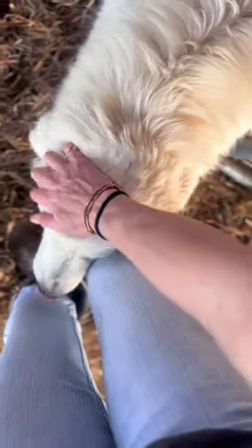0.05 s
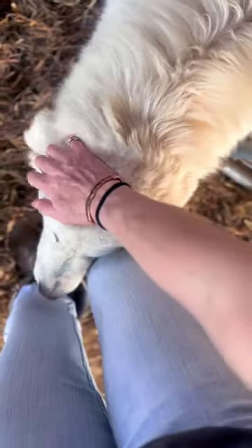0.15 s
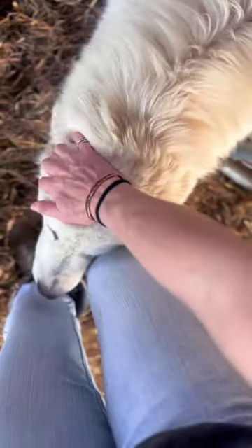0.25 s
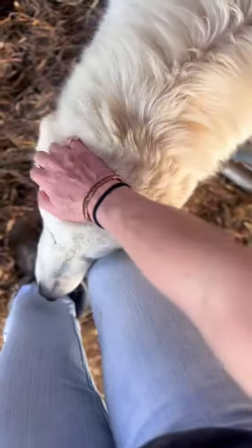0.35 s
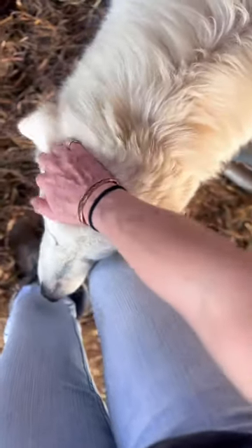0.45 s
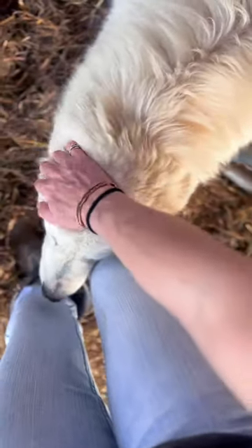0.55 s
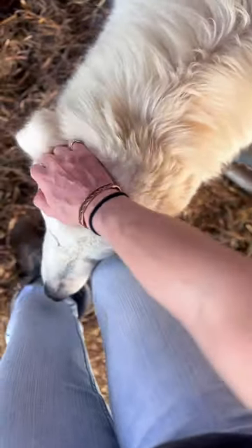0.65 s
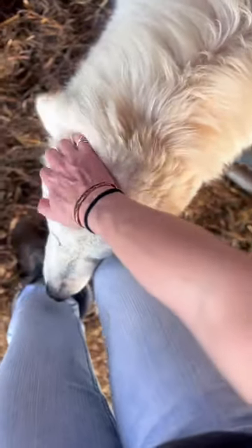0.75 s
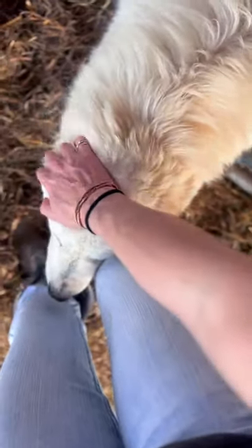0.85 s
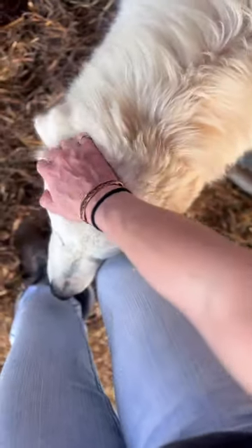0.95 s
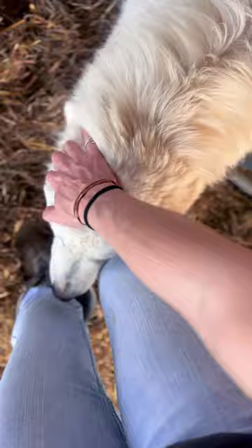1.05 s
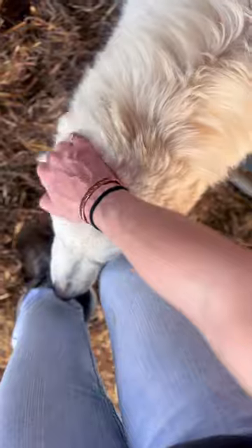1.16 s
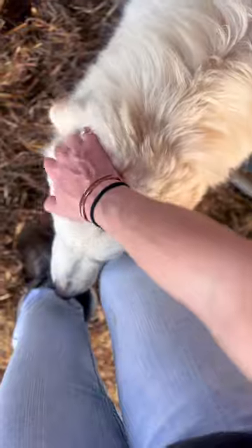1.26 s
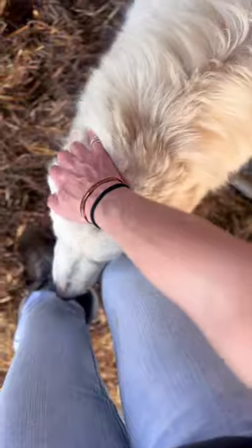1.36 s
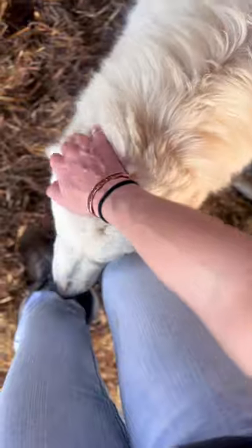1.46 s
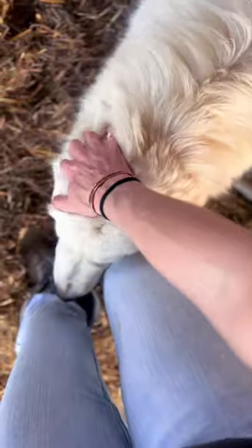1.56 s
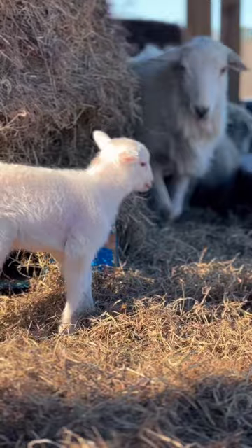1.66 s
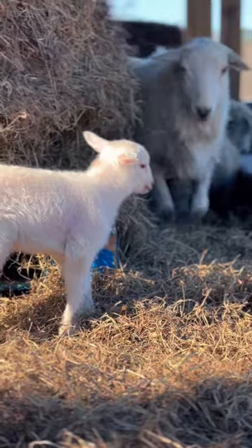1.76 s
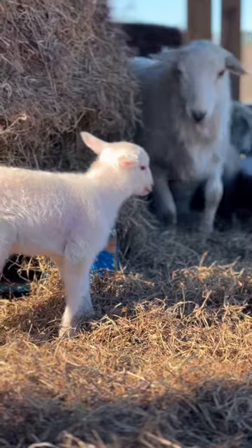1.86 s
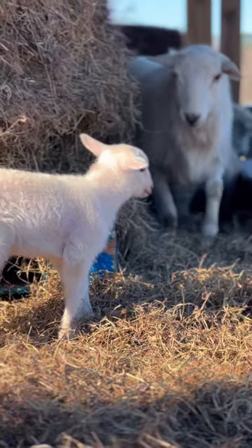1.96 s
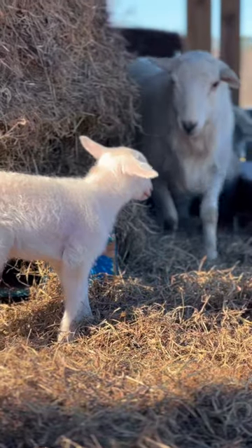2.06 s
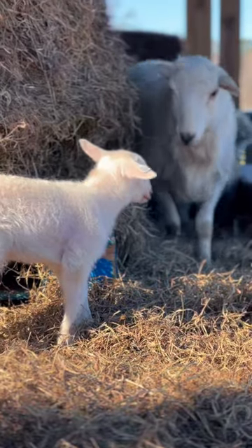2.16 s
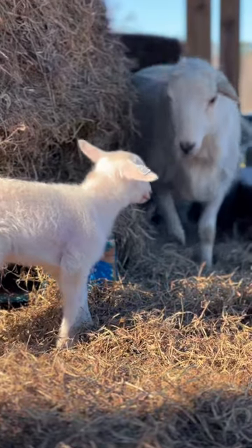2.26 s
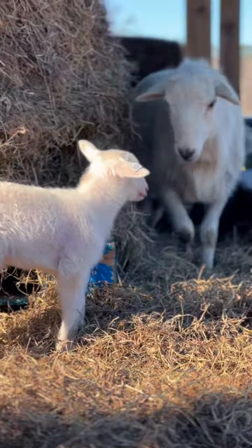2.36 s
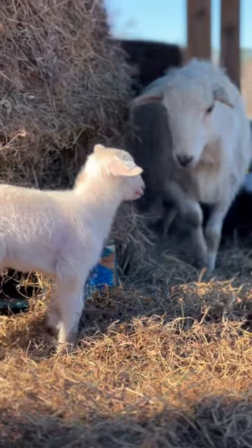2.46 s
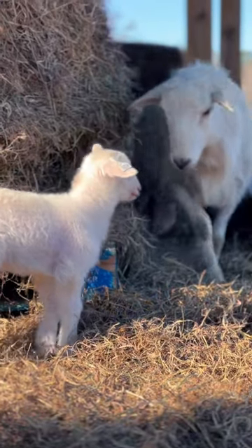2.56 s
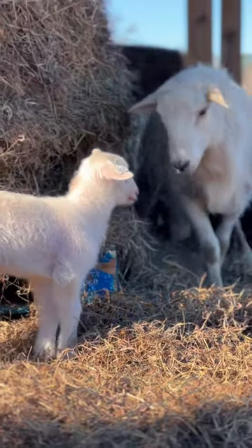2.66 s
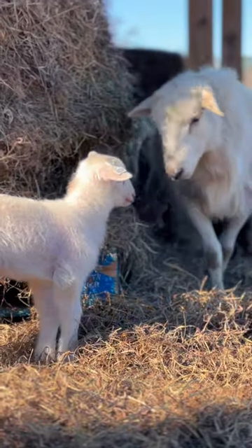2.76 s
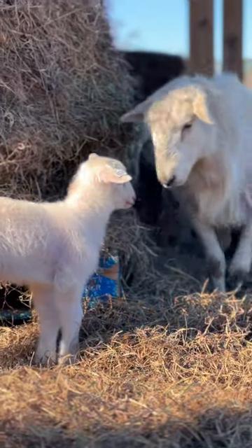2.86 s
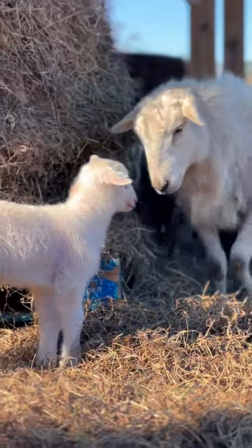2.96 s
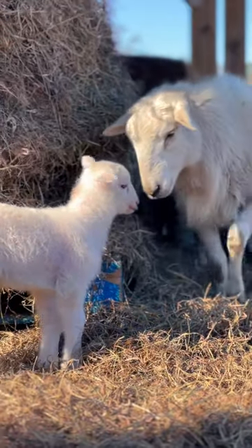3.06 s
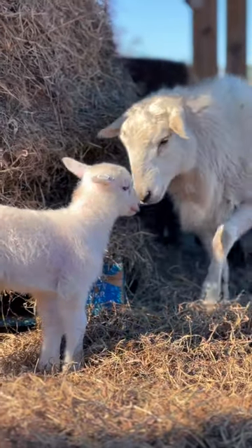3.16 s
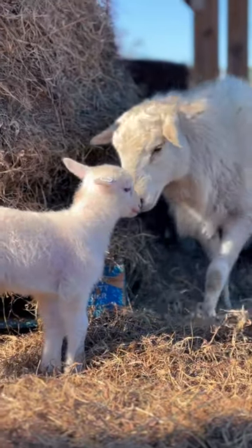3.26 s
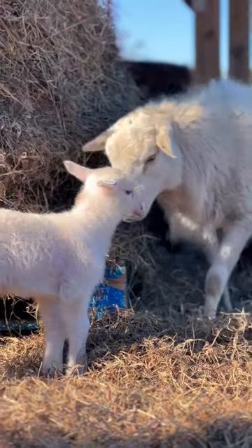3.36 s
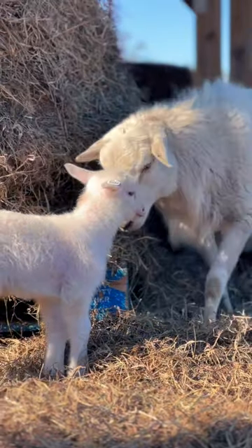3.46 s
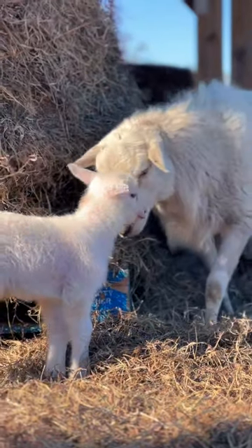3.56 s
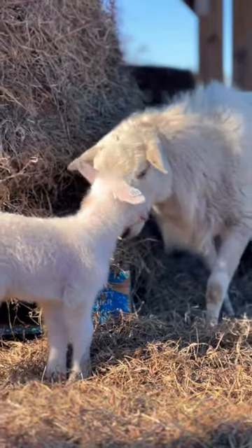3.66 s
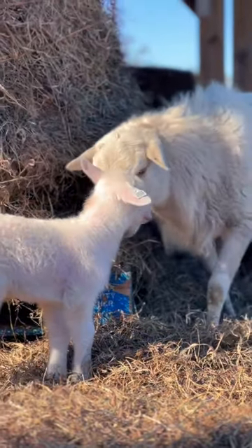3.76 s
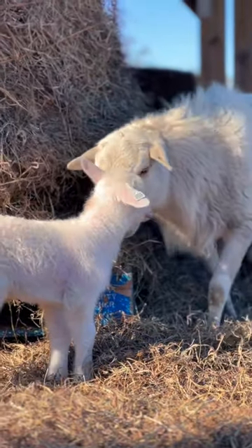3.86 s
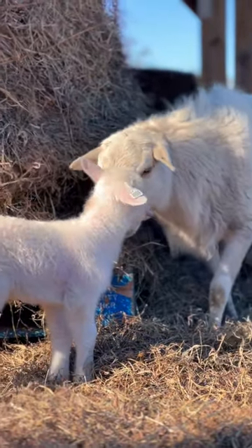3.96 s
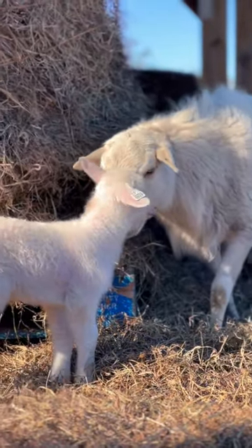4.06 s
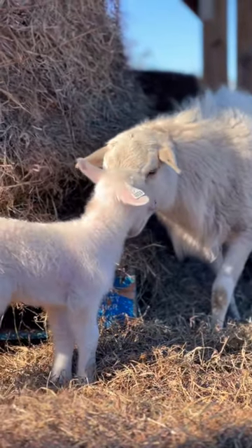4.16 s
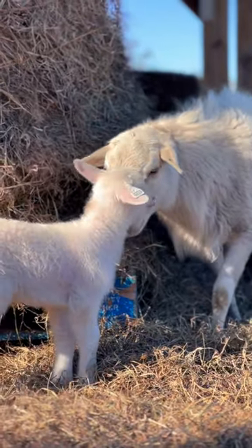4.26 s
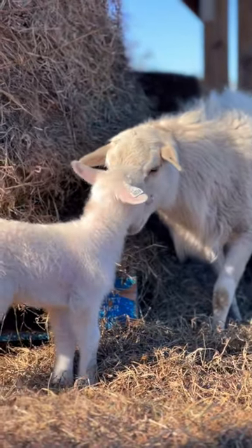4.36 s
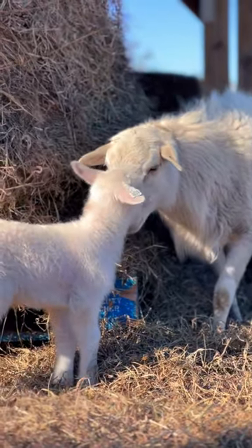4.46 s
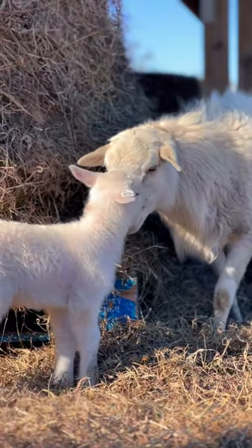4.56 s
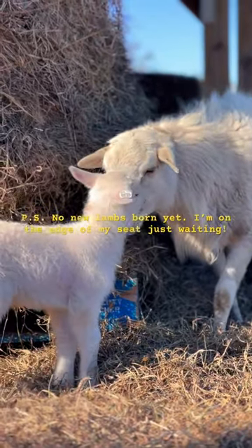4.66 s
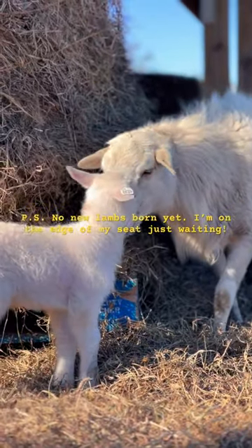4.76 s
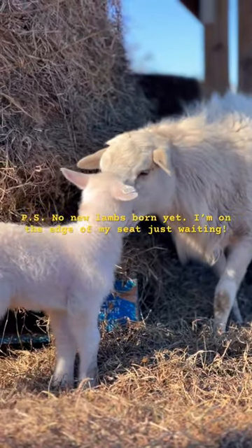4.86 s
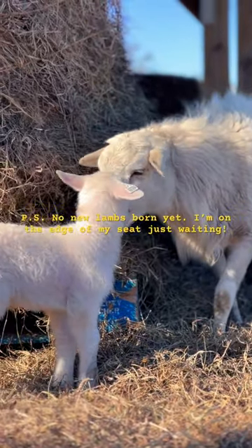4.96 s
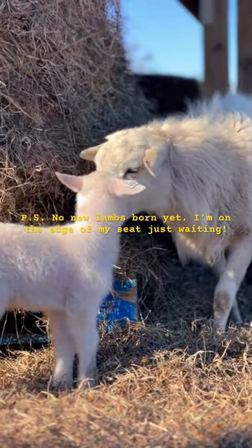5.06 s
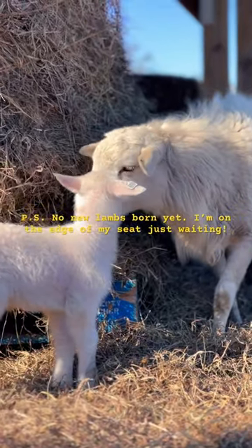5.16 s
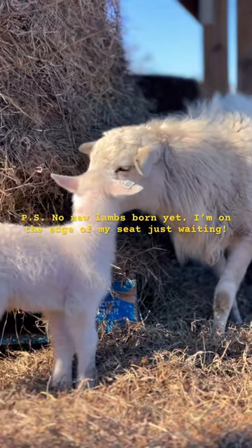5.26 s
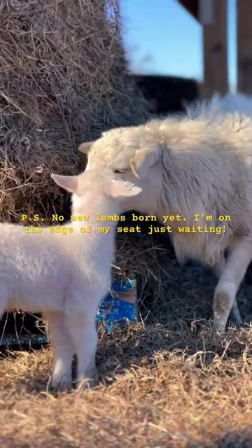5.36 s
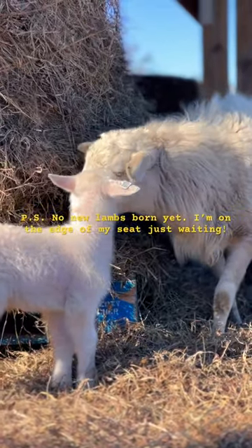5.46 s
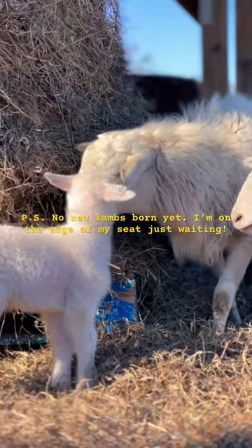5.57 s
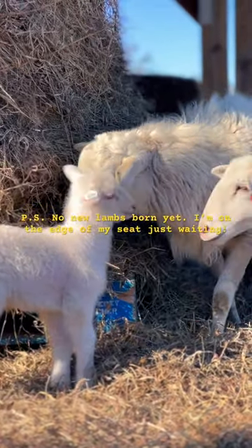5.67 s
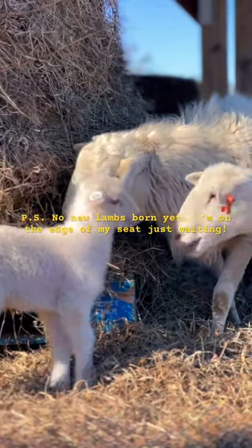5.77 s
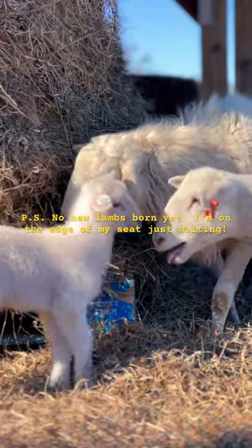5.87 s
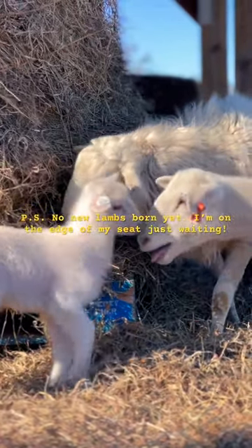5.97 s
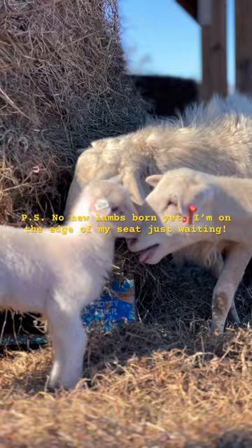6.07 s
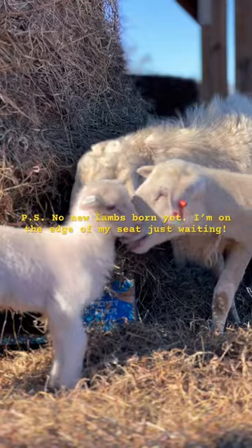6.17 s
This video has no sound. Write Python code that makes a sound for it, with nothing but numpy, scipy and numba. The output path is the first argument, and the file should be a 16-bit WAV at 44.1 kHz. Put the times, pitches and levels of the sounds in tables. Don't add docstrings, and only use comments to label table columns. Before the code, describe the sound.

A faint distant sheep bleat beside soft dog sniffs and a snort, then three close, hoarse, quavering bleats in a windy hay barn.

```python
import sys
import numpy as np
from scipy import signal
from scipy.fft import rfft, irfft, next_fast_len
from scipy.io import wavfile
from scipy.ndimage import uniform_filter1d
from numba import njit

SR = 44100
rng = np.random.default_rng(int(sys.argv[2]) if len(sys.argv) > 2 else 0)


def linear_from_db(decibels):
    return 10 ** (np.asarray(decibels, float) / 20)


def to_wav(sig):
    pcm = np.clip(np.atleast_2d(sig), -1, 1) * 32767
    pcm = np.round(pcm).astype(np.int16)
    wavfile.write(sys.argv[1], SR, pcm.T)


N = 274743
CUT_S = 1.661

# start_s, chest_level_db, pitch_hz, fold_pressing_db (brightness)
FAR_BLEAT = [
    (0.42, -60, 160.2, -5),
    (0.468, -48, 159.7, -11.5),
    (0.574, -47, 175.7, -6),
    (0.612, -43, 177.5, -18.5),
    (0.66, -44.5, 181.2, -8),
    (0.716, -41.5, 185.8, -16.5),
    (.8, -46, 182.9, -8.5),
    (0.88, -45, 178.2, -12.5),
    (0.93, -51, 180.4, -19),
]
FIRST_BLEAT = [
    (2.114, -40, 161, 3),
    (2.16, -33.5, 165.5, -2.5),
    (2.25, -33.5, 171.3, -6.5),
    (2.305, -33.5, 173.3, -2),
    (2.335, -37, 190.4, -1.5),
    (2.41, -30.5, 176.3, -2),
    (2.451, -33, 188.6, -0.5),
    (2.52, -35.5, 175.2, -1.5),
    (2.619, -59, 150, 8.5),
]
SECOND_BLEAT = [
    (3.462, -40.5, 157, 0.5),
    (3.566, -31, 166, 5.5),
    (3.64, -32.5, 175.8, 0),
    (3.684, -31.5, 164.3, -1.5),
    (3.73, -34, 182, -1),
    (3.8, -35.5, 183, -3),
    (3.852, -34.5, 165.4, 2.5),
    (3.962, -38.5, 163, -1.5),
    (4.012, -64, 162, 2.5),
]
LAST_BLEAT = [
    (5.712, -39, 166.4, 12),
    (5.736, -49.5, 161, 13.5),
    (5.769, -34, 156, -4),
    (5.834, -28.5, 169, -3.5),
    (5.894, -31, 163.1, 3),
    (5.933, -28.5, 175, -2.5),
    (5.991, -28.5, 170, 3),
    (6.082, -29, 167.6, 0.5),
    (6.179, -51.5, 176, -16.5),
]
# throat_hz, throat_width_hz, sinus_db, nose_top_hz, shut_mouth_drop (0-1), opening_s
VOICES = [
    (673, 143, -3.5, 22000, 0.05, 0.56),
    (680, 194, 1.5, 5700, 0.07, 0.028),
    (675, 192, -1, 3870, 0.4, 0.035),
    (671, 184, 2, 3110, 0.14, 0.083),
]
# mouth_hz, nose_hz, mouth_db, rasp_start_db, rasp_rise_db_per_s
MOUTHS = [
    (1790, 2770, -4.5, -5, 28.5),
    (1905, 2830, 0, -9, -6),
    (1874, 2726, -8.5, -31.5, 36),
    (1820, 2708, -5, -33.5, 26),
]
# mouth_sag_hz_per_s, mouth_width_hz, low_chest_db, nose_width_hz, nose_climb_hz_per_s
TRACTS = [
    (-60, 150, -9.5, 70, -300),
    (54.5, 118, -7.5, 380, -100),
    (198, 53, -8, 290, 0),
    (332, 140, -13, 147, 150),
]
# period_jitter (0-1), pulse_spread_db, breath_share (0-1)
HOARSE = [
    (.022, 2.2, .65),
    (.01, 1.4, .28),
    (.008, 1.3, .26),
    (.01, 1.3, .3),
]
# centre_hz, width_hz, level_db
RASP_MODES = [
    [(4570, 780, 5), (5800, 320, 1), (6800, 600, 0), (8600, 700, -10)],
    [(4500, 420, 7), (5870, 520, 1.5), (7260, 690, 2), (8940, 420, -5)],
    [(3840, 250, 8), (5440, 450, 1.5), (6080, 500, -4), (8550, 760, 0)],
    [(4200, 240, 7), (5780, 520, 0), (7100, 220, 1), (8470, 370, -4.5)],
]
# level_db (beside the chest), rise_db_per_s
BUZZ = [
    (-28.5, 12),
    (-10, -15),
    (-11, 19),
    (-26, -9),
]
BUZZ_TOP_HZ = [1320, 2000, 1940, 1170]
MOUTH_FADE_DB_PER_S = [-5, -8, 27, 7]
SINUS_HZ = [3440, 3428, 3387, 3504]
SINUS_RISE_DB_PER_S = [-9, 8.5, 21.5, 20]
THROAT_CLIMB_HZ_PER_S = [48.7, 53.6, 140, 22]
CHEST_FLOOR_HZ = [151, 410, 505, 450]
ECHO_DB = [-9, -11, -11, -13]
# start_s, peak_db
SLAPS = [(2.1253, -28), (2.1299, -22), (2.1534, -7.5), (2.1784, -11.5), (2.2126, -9), (2.2291, -12.5),
         (2.287, -6.5), (2.3111, -8), (2.343, -20), (2.3544, -14), (2.3701, -17), (2.3874, -7),
         (2.3933, -4.5), (2.4052, -10), (2.4274, -16), (2.4603, -10), (2.4654, -7.5), (2.495, -16),
         (2.524, -15), (2.5399, -8.5), (2.5777, -22), (3.4685, -29), (3.4864, -21), (3.5057, -9.5),
         (3.5385, -7), (3.5616, -11.5), (3.5846, -3.5), (3.621, -11), (3.6912, -12), (3.7118, -14),
         (3.7329, -8.5), (3.75, -8), (3.7714, -6.5), (3.7835, -9.5), (3.7939, -13.5), (3.8171, -6.5),
         (3.8359, -7.5), (3.8659, -13), (3.8967, -15.5), (3.9211, -24.5), (3.9383, -16.5), (5.7142, -21),
         (5.7325, -16), (5.759, -19), (5.7718, -16), (5.7899, -9), (5.8255, -15), (5.8547, -8),
         (5.8786, -5), (5.9026, -11), (5.9485, -1.5), (5.9722, -5.5), (5.9836, -5), (6.0242, -3),
         (6.0474, -4), (6.0722, -12), (6.1011, -4)]
# start_s, end_s, times_hoarser
BREAKS = [
    (2.32, 2.38, 1.6),
    (2.52, 2.62, 1.8),
    (3.695, 3.82, 3.5),
    (3.9, 4.02, 2.2),
    (6.08, 6.105, 1.6),
    (6.105, 6.17, 4),
]
# centre_s, chest_db, mouth_and_nose_db
CATCHES = [(0.494, -3.5, 1.5), (.562, -12.5, -4), (0.652, -10, -4), (0.697, -7.5, -1), (0.736, -8, 3),
           (.772, -4, 3), (0.811, -7, -1), (0.863, -1.5, -1), (0.903, -13.5, -2), (2.173, -10, 2.5),
           (2.247, -14.5, 6), (2.299, -3, 1.5), (2.339, 4.5, -2), (2.407, -43.5, -4.5), (2.485, -12, -5),
           (3.526, -40.5, -11.5), (3.602, -5.5, 0.5), (3.728, 8, -5.5), (3.837, -9.5, -0.5),
           (3.916, 3.5, -12), (5.864, 1, 5.5), (5.97, -9, 1), (6.04, -18, -6), (6.115, -3.5, -2)]
# centre_s, level_db, spread_s
FLARES = [(2.155, 3, .005), (2.289, 7.5, .005), (2.313, 8, .005), (2.371, -4, .004), (2.396, 9.5, .007),
          (2.467, 6, 0.0074), (2.496, 7, .005), (2.546, 10, .006), (2.585, 4, .008), (3.586, 5, .006),
          (3.718, 13, .006), (3.82, 12, .005), (3.838, 4.5, .006), (3.872, 9.5, .012), (3.942, 12, .012),
          (5.79, 16, .005), (5.882, 8, .012), (5.954, 13.5, .008), (5.974, 4, .005), (6.028, 8, .007),
          (6.051, 9.5, .006), (6.103, 17.5, .006), (6.124, 32, .007)]
# centre_s, level_db, spread_s
SINGS = [(.52, -52, 0.031), (.6, -51, 0.018), (0.67, -43, 0.0075), (.718, -57, 0.0093),
         (0.754, -37.5, 0.0041), (.79, -59, 0.0062), (0.841, -73, 0.015), (.885, -56, 0.0082),
         (2.21, -64, 0.017), (2.454, -29, 0.0065), (3.569, -37.5, 0.0068), (3.636, -31.5, 0.013),
         (3.78, -39.5, 0.021), (3.9, -40, 0.0095), (5.806, -29.5, 0.018), (5.84, -21, 0.008),
         (5.937, -24, 0.014), (6.022, -39, 0.014), (6.085, -41, 0.0076)]
MOUTH_FOLLOWS, RASP_FOLLOWS = 0.43, 2.08
CATCH_S, CATCH_SAG_HZ_PER_DB = 0.0062, .4
WANDER_S, NOSE_WANDER, WAVER = .02, .018, .3
LIMP_DB = 2.5
REOPEN_SHARE, REOPEN_AT = .3, .52
SING_OVERTONE, SING_WIDTH_HZ = 4, 45
FLICKER_DB, FLICKER_PER_S = 2.2, 28
MOUTH_FLICKER_DB, RASP_FLICKER_DB = 1.3, 2.0
LATE_NOSE_S, LATE_RASP_S = 0.025, 0.027
ATTACK_S, RELEASE_S = 0.009, 0.023

# start_s, end_s, pulses_per_s, first_db, last_db
CREAK_SPELLS = [
    (3.35, 3.391, 137, -57, -50),
    (3.3974, 3.425, 87, -48, -50),
    (5.574, 5.62, 130, -61.5, -51),
    (5.686, 5.713, 150, -43.5, -46),
]
# start_s, end_s, pulses_per_s, first_db, last_db
WAKING_SPELLS = [
    (2.088, 2.14, 165, -43.5, -21),
    (3.432, 3.479, 170, -53, -27),
]
# start_s, peak_db
TICKS = [(2.004, -58), (2.019, -68), (2.027, -60), (2.053, -59), (2.064, -59), (2.07, -57), (5.6285, -54),
         (5.641, -54), (5.65, -53), (5.6591, -46), (5.669, -54), (5.677, -50), (5.7151, -33.5)]
# centre_hz, width_hz, level_db
CREAK_MODES = [(1350, 330, 3.5), (1670, 510, 0.5), (2600, 170, 7)]
# centre_hz, width_hz, level_db
GRUNT_MODES = [(676, 180, 0.5), (1095, 130, 4), (1900, 200, -3), (2306, 100, 0.5), (2720, 540, -7)]
# centre_s, spread_s, pitch_hz, level_db
MURMUR = (5.705, .02, 178, -34)
CREAK_GAP_SPREAD, CREAK_SPREAD_DB = .05, 1.5
NARROW_UNTIL_S, NARROW_CUT_HZ = 4, 1000
WAKING_HZ, WAKING_WIDTH_HZ = 1910, 210

# time_s, level_db
SNORT = [
    (1.47, -68),
    (1.53, -48.5),
    (1.574, -49.5),
    (1.628, -48.5),
    (1.66, -55.5),
]
# centre_s, level_db, spread_s
SNIFFS = [
    (.06, -65, 0.013),
    (.13, -62.5, 0.056),
    (.265, -58, 0.017),
    (.33, -62, 0.028),
    (.4, -64, 0.034),
]
# centre_hz, width_hz, level_db
SNOUT_MODES = [(487, 220, 2), (1385, 230, 5), (1900, 270, 2), (2970, 630, -4), (4250, 810, -4),
               (5350, 1000, -6.5), (7600, 1500, -9)]

# time_s, rumble_db, flutter_db (relative)
WIND_FAR = [
    (0.0, -99, -31),
    (0.032, -60, 13),
    (0.832, -59, 12),
    (0.99, -63.5, -4),
    (1.5, -55, -5),
    (1.655, -69, 22.5),
]
# time_s, rumble_db, flutter_db (relative)
WIND_NEAR = [(1.66, -47.5, 12), (1.88, -35, -6), (1.95, -46.5, 1), (2.07, -36, 1.5), (2.44, -43.5, 2),
             (3.35, -47.5, 2), (3.7, -50.5, 9), (4.84, -47.5, -5), (5.1, -47.5, -9.5), (5.48, -53.5, -9),
             (5.73, -52.5, 9), (6.23, -55.5, 6)]
# centre_s, rumble_db, flutter_db
BUFFETS = [(0.056, 10.5, -1.5), (.17, 7.5, -71), (.27, 16.5, -7), (.54, -6, -7), (.602, 4, -1),
           (.74, 2, -11), (.814, -1, 2.5), (1.008, 2, 5), (1.681, 12.5, -5), (1.73, -0.5, -2.5),
           (1.84, 3, -4), (1.958, 13, 13), (2.22, 6, 5.5), (2.351, 0, 1), (2.399, 13, 7.5),
           (2.626, 9.5, 12.5), (2.663, -1.5, -8.5), (3.019, 5.5, 6.5), (3.06, 0, -5.5), (3.15, 1, -1),
           (3.29, 8.5, -4), (3.315, -9, -9.5), (3.346, 4, 4), (3.61, 8, -7), (3.79, 14, -5),
           (3.88, -6, -13), (3.951, 3.5, 3), (4.052, 10.5, 5.5), (4.319, 11, 7.5), (4.69, 3.5, 4.5),
           (5.139, 4, -4), (5.308, 2.5, 1.5), (5.64, 5, 0.5), (5.9, -16, -1), (6.11, 8.5, 1.5)]
BUFFET_S = 0.026
# centre_s, peak_db, pitch_hz
POPS = [(.055, -39, 356), (.32, -52, 645), (.39, -53, 744), (.43, -63, 800), (1.161, -48, 385),
        (1.77, -46.5, 344), (1.817, -60, 353), (1.896, -61, 490), (1.94, -39, 470), (2.021, -37, 423),
        (2.805, -53, 407), (2.874, -62, 369), (2.969, -47, 398), (3.004, -37, 380), (3.085, -52, 361),
        (3.176, -44.5, 390), (3.316, -52, 600), (3.347, -48, 580), (4.161, -46, 398), (4.319, -48, 456),
        (4.561, -58, 290), (4.65, -62, 610), (4.865, -59, 425), (4.905, -47, 390), (4.995, -63, 630),
        (5.171, -58, 510), (5.23, -61, 640), (5.26, -53, 487), (5.385, -59, 920), (5.42, -57, 1200)]
POP_CYCLES = 1.15

# centre_s, level_db, spread_s
STIRS = [(.08, -68.5, 0.072), (.29, -68, 0.017), (.58, -68, 0.22), (.81, -69, 0.029), (1.063, -64.5, 0.029),
         (1.452, -68, 0.18), (1.942, -63, 0.076), (2.5, -63.5, 0.29), (3.1, -58.5, 0.099),
         (3.42, -65.5, 0.061), (3.749, -62, 0.16), (4.09, -67, 0.016), (4.3, -73.5, 0.17),
         (4.72, -79, 0.052), (4.991, -70, 0.053), (5.294, -67, 0.051), (5.467, -67.5, 0.046),
         (5.6, -68.5, 0.028), (5.86, -57, 0.07), (6.08, -63.5, 0.068)]
# freq_hz, density_db
RUSTLE_MID = [(700, -24.5), (1200, -9.5), (4000, -7), (5100, -9), (6200, -2.5), (8000, 2), (11000, 2.5),
              (12200, -0.5), (12700, -55)]
# freq_hz, density_db
RUSTLE_SIDE = [(4200, -40), (5000, -3.5), (5700, -21.5), (6000, -50), (7600, -50.5), (8000, -7),
               (12000, -2), (15800, -3)]
BED_DB = -74.5

# centre_hz, width_hz, rms_db, start_s
HUM = [
    (517, 9.9, -81, 4.9),
    (1001, 45, -82, 2.46),
]
HUM_FADES_S, HUM_FADE_DB_PER_S = 5.3, 1
DRONE_HZ, DRONE_DB, DRONE_FROM_S, DRONE_TO_S = 291.5, -62, 4.55, 5.65

# freq_hz, density_db
AIR_FAR = [(260, 0.5), (450, -2), (610, -12), (645, -30), (708, -17), (942, -14.5), (1120, -20),
           (1950, -11), (4090, -27), (5320, -17.5), (9000, -120)]
# freq_hz, density_db
AIR_NEAR = [(260, -9), (450, -9), (522, -4.5), (546, -14), (622, -12.5), (701, -18), (1020, -14.5),
            (1580, -14), (4090, -27), (5320, -69.5), (9000, -120)]
AIR_FAR_DB, AIR_NEAR_DB = -59.5, -72
# freq_hz, level_db
WIDE_FAR = [(60, -32), (150, -14.5), (370, -9.5), (930, 1.5), (1500, -7), (3600, 1.5), (5600, -7),
            (6100, -47)]
# freq_hz, level_db
WIDE_NEAR = [(150, -53), (370, -40.5), (650, -10.5), (950, -19), (1500, -29), (2500, -48)]
# freq_hz, level_db
WIDE_TOP = [(4100, -47.5), (4500, -9.5), (5100, 7), (5700, -20), (6000, -49), (7500, -52), (8000, -7)]


def bleat(rows, mouth_row, voice, hoarse, fading, sinus_hz, climb, rasp_modes, buzz_row, sinus_rise, floor_hz,
          tract, buzz_top_hz):
    throat_hz, throat_width, sinus_db, top_hz, drop, opening_s = voice
    mouth_hz, nose_hz, mouth_db, rasp_db, rasp_rise = mouth_row
    sag, mouth_width, low_chest_db, nose_width, nose_climb = tract
    begin_s = rows[0][0]
    start, count = round(begin_s * SR), round((rows[-1][0] - begin_s) * SR)
    span = slice(start, start + count)
    chest_db, pitch, pressing = in_time(rows, count=count)
    age = np.arange(count) / SR
    centred = age - age.mean()

    opening = 1 - drop * np.clip(1.3 - 2.0 * age / opening_s, 0, 1)
    mouth_hz = mouth_hz - sag * centred
    nose_hz = nose_hz + nose_climb * centred
    throat_hz = throat_hz + climb * centred

    nose_db = chest_db + pressing
    mouth_db = chest_db + MOUTH_FOLLOWS * pressing + mouth_db - fading * centred
    rasp_db = chest_db + RASP_FOLLOWS * pressing + rasp_db + rasp_rise * age
    dips = np.array([np.exp(-.5 * ((age + begin_s - s) / CATCH_S) ** 2) for s, low, high in CATCHES])
    low_db, high_db = np.transpose(CATCHES)[1:] @ dips
    chest_db, mouth_db, nose_db = chest_db + low_db, mouth_db + high_db, nose_db + high_db
    rasp_db = rasp_db + high_db + sum(db * bump(s, spread)[span] for s, db, spread in FLARES)
    buzz_db = chest_db + buzz_row[0] + buzz_row[1] * centred

    noise = rng.standard_normal(SR)[:count]
    window = int(WANDER_S * SR)
    wander = NOSE_WANDER * rms_one(uniform_filter1d(uniform_filter1d(noise, window), window))
    pitch = pitch + CATCH_SAG_HZ_PER_DB * low_db
    cycles = np.cumsum(pitch * (1 + WAVER * np.roll(wander, count // 2))) / SR
    slap_samples = [round(s * SR) - start for s, db in SLAPS]
    cycles = in_step(cycles, [i for i in slap_samples if 0 < i < count])
    flow, rough, snap = fold_pulses(cycles, pitch, nose_db, begin_s, hoarse, noise)

    chest = resonance(resonance(flow, throat_hz, throat_width * 1.03), throat_hz * opening, throat_width)
    chest += linear_from_db(low_chest_db) * resonance(flow, 524.0, 163.0)
    chest -= linear_from_db(-33.0) * resonance(flow, 1252.0, 550.0)
    chest = passed(chest, 3, floor_hz, "high")
    mouth = resonance(resonance(snap + 1.0 * flow, mouth_hz * opening, mouth_width), mouth_hz, 1100.0)
    mouth -= linear_from_db(-8.5) * resonance(flow, 1700.0, 450.0)
    upper_db = sinus_db + sinus_rise * centred + FLICKER_DB * drift(FLICKER_PER_S)[:count]
    nose = resonance(snap, nose_hz * (opening + wander), nose_width)
    nose -= linear_from_db(upper_db) * resonance(snap, (1 + wander[::-1]) * sinus_hz * np.sqrt(opening), 186.0)
    nose += linear_from_db(sinus_db - 14.0) * resonance(snap, 4330.0, 310.0)
    nose = passed(nose, 2, [2050.0, top_hz], "band")
    rasp = passed(modes(rough, rasp_modes), 2, [4100.0, 9500.0], "band")
    buzz = passed(snap, 3, [900.0, buzz_top_hz], "band")

    overtone_hz = SING_OVERTONE * uniform_filter1d(np.gradient(cycles) * SR, window)
    sing_level = sum(linear_from_db(db) * bump(s, spread)[span] for s, db, spread in SINGS)
    total = sing_level * even(resonance(chest, overtone_hz, SING_WIDTH_HZ), 0.045)

    chest_db = chest_db + 2.2 * drift(22)[span]
    mouth_db = mouth_db + MOUTH_FLICKER_DB * drift(FLICKER_PER_S)[:count]
    rasp_db = rasp_db + RASP_FLICKER_DB * drift(FLICKER_PER_S)[:count]
    layers = [(chest_db, chest, 0), (mouth_db, mouth, 0), (nose_db, nose, LATE_NOSE_S),
              (rasp_db, rasp, LATE_RASP_S), (buzz_db, buzz, 0)]
    for db, part, late_s in layers:
        total = total + linear_from_db(db) * even(part, 0.0438) * np.minimum(1, age / (late_s + 1e-4)) ** 2
    out = np.zeros(N)
    out[span] = total * np.minimum(1, np.minimum(age / ATTACK_S, age[::-1] / RELEASE_S)) ** 2
    return out


def in_step(cycles, marks):
    shifts = [0]
    for i in marks:
        shifts.append(np.round(cycles[i] + shifts[-1]) - cycles[i])
    return cycles + np.interp(np.arange(len(cycles)), [0] + marks, shifts)


def fold_pulses(cycles, pitch, nose_db, begin_s, hoarse, noise):
    jitter, spread_db, breath = hoarse
    start, count = round(begin_s * SR), len(cycles)
    draw = rng.standard_normal((200, 2))
    beat = np.searchsorted(cycles, np.arange(1, int(cycles[-1])))
    when = begin_s + beat / SR
    for first, last, times in BREAKS:
        inside = (when > first) & (when < last)
        draw[:len(beat)][inside] *= [times, np.sqrt(times)]
        draw[:len(beat):2, 1][inside[::2]] -= LIMP_DB * (times - 1) / spread_db
    late = (jitter * SR / pitch[beat] * draw[:len(beat), 0]).astype(int)
    at = np.clip(beat + late, 0, count - 1)
    size = linear_from_db(spread_db * draw[:len(beat), 1])

    flow, snap = np.zeros((2, count))
    flow[at] = -np.sqrt(size)
    for s, db in SLAPS:
        i = round(s * SR) - start
        if 0 < i < count:
            nearest = np.argmin(abs(at - i))
            at[nearest], size[nearest] = i, linear_from_db(np.clip(db - nose_db[i] - 19.0, -6, 12))
    snap[at] = -size
    reopen = (at[:-1] + REOPEN_AT * np.diff(at)).astype(int)
    snap[reopen] = REOPEN_SHARE * linear_from_db(4 * draw[100:99 + len(at), 0])

    puff = rms_one(noise * np.exp(-3.5 * (cycles % 1)))
    flow = rms_one(flow)
    rough = rms_one(snap + flow)
    return flow + breath * puff, rough + .9 * puff, rms_one(snap) + breath * puff


def creaks():
    clicks = np.zeros((2, N))
    for row, table in zip(clicks, (creak_pulses(TICKS, CREAK_SPELLS), creak_pulses([], WAKING_SPELLS))):
        row[(table[:, 0] * SR).astype(int)] = linear_from_db(table[:, 1] + 29.0)
    creak, waking = clicks
    scratch = signal.lfilter([1], [1, -np.exp(-1 / (0.003 * SR))], creak) * rng.standard_normal(N)
    source = creak + 0.17 * scratch
    early = np.arange(N) / SR < NARROW_UNTIL_S
    pulses = passed(modes(source * early, CREAK_MODES), 3, NARROW_CUT_HZ, "high")
    pulses = pulses + modes(source * ~early, GRUNT_MODES) + resonance(waking, WAKING_HZ, WAKING_WIDTH_HZ)
    s, spread, hz, db = MURMUR
    t = np.arange(N) / SR - s
    hummed = linear_from_db(db) * np.exp(-.5 * (t / spread) ** 2) * np.sin(2 * np.pi * hz * t * (1 + 2.7 * t))
    return passed(pulses, 2, [450.0, 3500.0], "band") + hummed


def creak_pulses(lone, spells):
    rows = list(lone)
    for first, last, rate, first_db, last_db in spells:
        draw = rng.standard_normal((30, 2))
        s = first + np.cumsum(np.exp(CREAK_GAP_SPREAD * draw[:, 0])) / rate - 1 / rate
        db = np.interp(s, [first, last], [first_db, last_db]) + CREAK_SPREAD_DB * draw[:, 1]
        rows += list(np.transpose([s, db])[(s < last) & (s > 0)])
    return np.array(rows)


def barn(x):
    t = np.arange(int(.3 * SR)) / SR
    tails = rng.standard_normal((2, len(t))) * linear_from_db(-60 * t / .3) * (t > .003)
    return [signal.fftconvolve(x, tail / np.sqrt(np.sum(tail ** 2)))[:N] for tail in tails]


def snort():
    t = np.arange(N) / SR
    level = linear_from_db(in_time(SNORT)[0] + 0.67 * drift(36)) * (t > SNORT[0][0]) * (t < CUT_S)
    level = level + swells(SNIFFS)
    return level * rms_one(modes(rng.standard_normal(N), SNOUT_MODES))


def wind():
    rumble_db, flutter_db = in_time(list(WIND_FAR) + list(WIND_NEAR))
    flutter_db = flutter_db + sum((flap_db - db) * bump(s, BUFFET_S) for s, db, flap_db in BUFFETS)
    rumble_db = rumble_db + sum(db * bump(s, BUFFET_S) for s, db, flap_db in BUFFETS)
    white = rng.standard_normal((3, N))
    rumble = shape(white[0], [(20, -36.0), (35, -11.5), (65, 4.0), (120, -4.5), (170, -25.5), (500, -99.0)])
    flutter = shape(white[1], [(80, -29.5), (130, -1.5), (230, -6.5), (330, -13.0), (450, -28.5), (1000, -83.0)])
    tips = shape(white[2], [(250, -42), (400, -12.5), (600, -22.5), (850, -33.5), (1500, -81.0)])
    lump = drift(20)
    flutter = even(flutter, 0.099) * linear_from_db(3.9 * lump)
    flutter = flutter + linear_from_db(-20.0 + 5.5 * np.clip(lump, -3, 1.6)) * rms_one(tips)
    rumble = even(rumble, 0.11) * linear_from_db(0.5 * drift(13))
    return linear_from_db(rumble_db) * (rumble + linear_from_db(flutter_db - 2.5) * flutter)


def pops():
    t = np.arange(N) / SR
    return sum(linear_from_db(db) * bump(s, POP_CYCLES / hz) * np.sin(2 * np.pi * hz * (t - s)) for s, db, hz in POPS)


def rustle():
    level = (linear_from_db(BED_DB) + swells(STIRS)) * linear_from_db(2.0 * drift(73))
    mid = shape(rng.standard_normal(N), RUSTLE_MID)
    side = shape(rng.standard_normal(N), RUSTLE_SIDE)
    return level * linear_from_db(3.5) * np.array([mid, side]) / np.std(mid)


def hum():
    t, white = np.arange(N) / SR, rng.standard_normal(N)
    lines = np.zeros(N)
    for hz, width, db, s in HUM:
        line = rms_one(resonance(resonance(white, hz, width), hz, width))
        lines += linear_from_db(db) * np.clip((t - s) / .3, 0, 1) * line
    return linear_from_db(-HUM_FADE_DB_PER_S * np.maximum(t - HUM_FADES_S, 0)) * lines


def drone():
    t = np.arange(N) / SR
    level = np.clip((t - DRONE_FROM_S) / .3, 0, 1) * np.clip((DRONE_TO_S - t) / .1, 0, 1)
    return linear_from_db(DRONE_DB + 3) * level * np.sin(2 * np.pi * DRONE_HZ * t)


def air(spectrum, db):
    swell = 1.2 * drift(4)
    return linear_from_db(db + swell) * np.array([rms_one(shape(w, spectrum)) for w in rng.standard_normal((2, N))])


def rms_one(x):
    return x / np.sqrt(np.mean(x ** 2) + 1e-20)


def even(x, window_s):
    x = rms_one(x)
    return x / np.sqrt(uniform_filter1d(x ** 2, max(int(window_s * SR), 8)) + 0.076)


def in_time(rows, count=None):
    s, *columns = np.transpose(rows)
    t = np.arange(N) / SR if count is None else s[0] + np.arange(count) / SR
    return [np.interp(t, s, c) for c in columns]


def bump(s, spread):
    return np.exp(-.5 * ((np.arange(N) / SR - s) / spread) ** 2)


def swells(table):
    return sum(linear_from_db(db) * bump(s, spread) for s, db, spread in table)


def drift(rate):
    r = np.exp(-80 * np.pi * rate / SR)
    slow = signal.lfilter([1], [1, -2 * r, r * r], rng.standard_normal(N // 40 + 2002))[2000:]
    return np.interp(np.arange(N) / 40, np.arange(len(slow)), rms_one(slow))


def shape(x, points):
    size = next_fast_len(len(x) + 4096)
    hz = np.maximum(np.fft.rfftfreq(size, 1 / SR), 1)
    point_hz, point_db = np.transpose(points)
    gain = linear_from_db(np.interp(np.log(hz), np.log(point_hz), point_db))
    return irfft(rfft(x, size) * gain, size)[:len(x)]


def passed(x, order, hz, kind):
    return signal.sosfilt(signal.butter(order, hz, kind, fs=SR, output="sos"), x)


@njit
def glide(x, cosine, r):
    y = np.zeros(len(x))
    for i in range(2, len(x)):
        y[i] = (1 - r * r) / 2 * (x[i] - x[i - 2]) + 2 * r * cosine[i] * y[i - 1] - r * r * y[i - 2]
    return y


def resonance(x, hz, width_hz):
    return glide(x + 1e-18, np.cos(2 * np.pi * hz / SR) * np.ones(len(x)), np.exp(-np.pi * width_hz / SR))


def modes(x, table):
    return sum((-1) ** k * linear_from_db(db) * resonance(x, hz, width) for k, (hz, width, db) in enumerate(table))


def scene():
    after = np.arange(N) / SR >= CUT_S
    whole = [FAR_BLEAT, FIRST_BLEAT, SECOND_BLEAT, LAST_BLEAT]
    settings = zip(whole, MOUTHS, VOICES, HOARSE, MOUTH_FADE_DB_PER_S, SINUS_HZ, THROAT_CLIMB_HZ_PER_S, RASP_MODES,
                   BUZZ, SINUS_RISE_DB_PER_S, CHEST_FLOOR_HZ, TRACTS, BUZZ_TOP_HZ)
    calls = np.array([bleat(*call) for call in settings])
    echo, other_echo = barn(linear_from_db(np.array(ECHO_DB)) @ calls)
    voice = calls.sum(axis=0) + echo + creaks()
    nose, gusts, hay = snort(), wind() + pops(), rustle()
    far, near = air(AIR_FAR, AIR_FAR_DB), air(AIR_NEAR, AIR_NEAR_DB)
    mid = voice + nose + gusts + hay[0] + np.where(after, near[0] + hum() + drone(), far[0])
    wide_far = shape(linear_from_db(10.0) * other_echo + barn(nose + gusts)[0] + far[1], WIDE_FAR)
    wide_near = shape(voice + gusts + linear_from_db(20) * near[1], WIDE_NEAR)
    wide_near = wide_near + shape(signal.hilbert(voice).imag, WIDE_TOP)
    side = hay[1] + np.where(after, wide_near, wide_far)
    return np.array([mid + side, mid - side])


def band_limit(x):
    return signal.sosfilt(signal.butter(12, 15800, fs=SR, output="sos"), x)


def record(dry):
    mid, side = (dry[0] + dry[1]) / 2, (dry[0] - dry[1]) / 2
    mid = shape(mid, [(4600, 1.0), (4950, -0.5), (5100, -4.5), (5400, 1.0), (12200, -9.0), (12600, -29.0)])
    return band_limit(np.array([mid + side, mid - side]))


dry = scene()
out = record(dry)
to_wav(out)
```